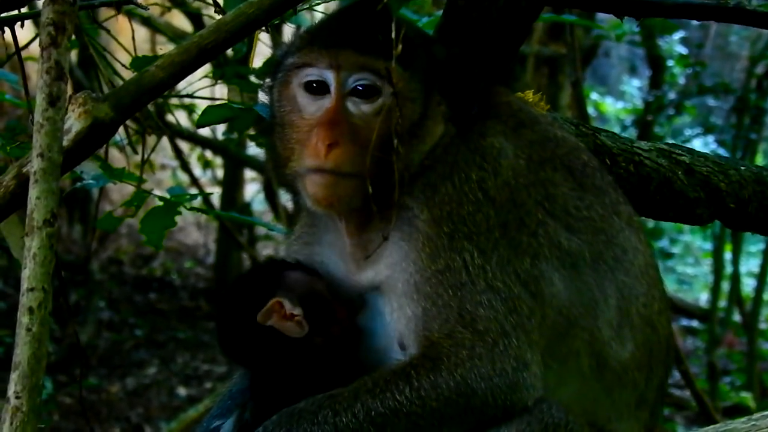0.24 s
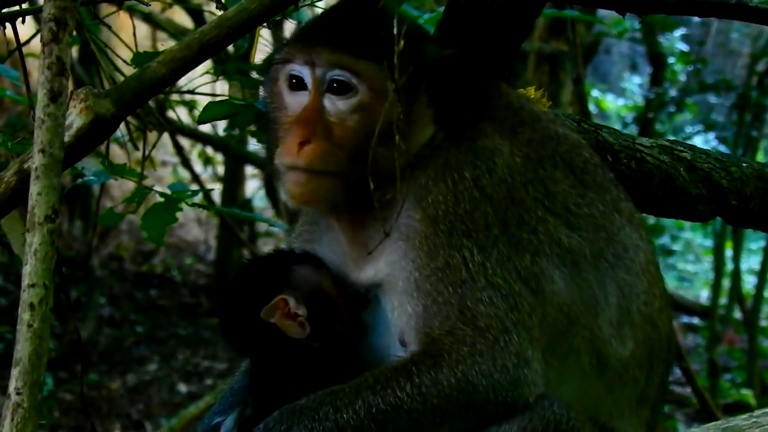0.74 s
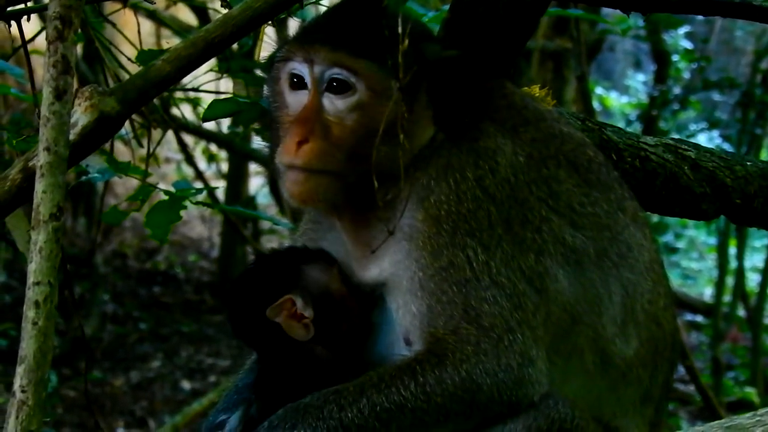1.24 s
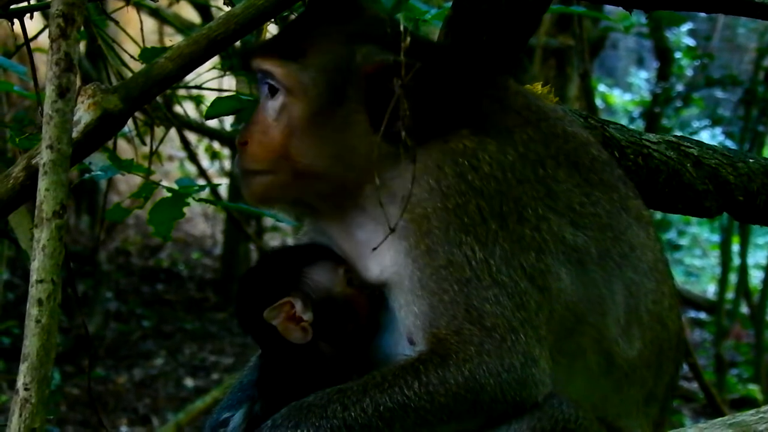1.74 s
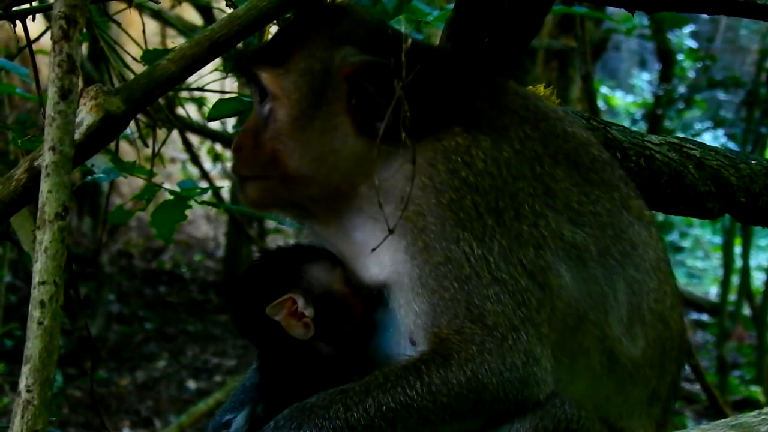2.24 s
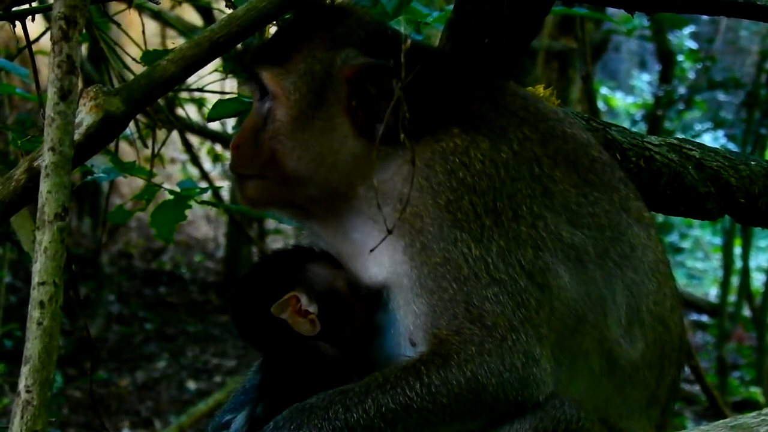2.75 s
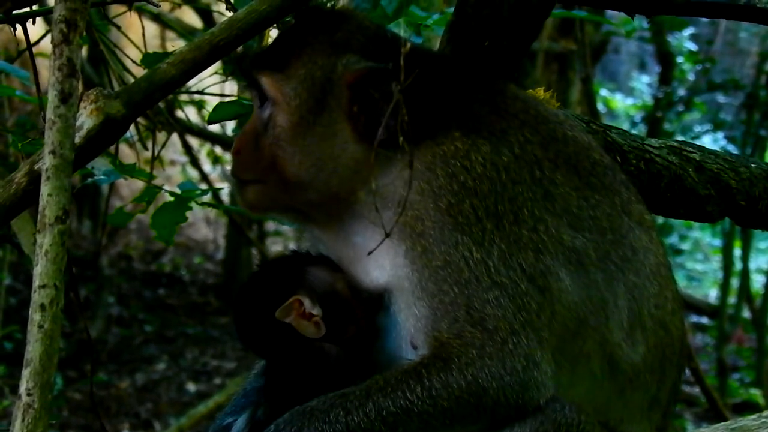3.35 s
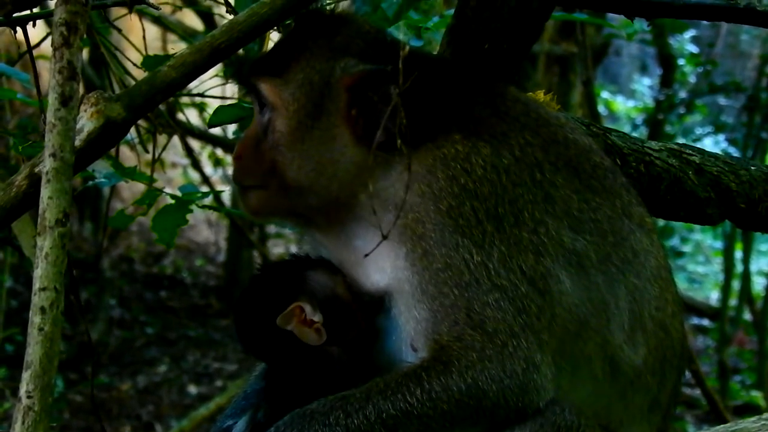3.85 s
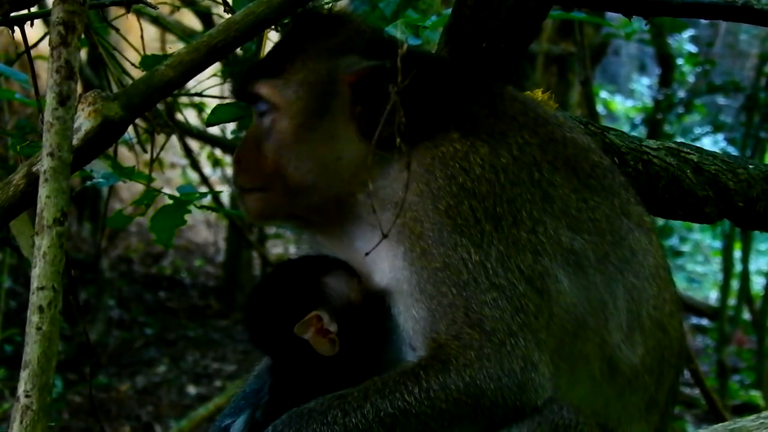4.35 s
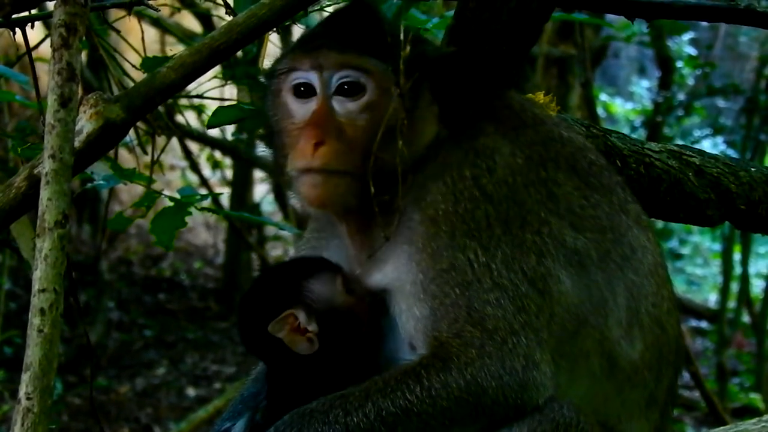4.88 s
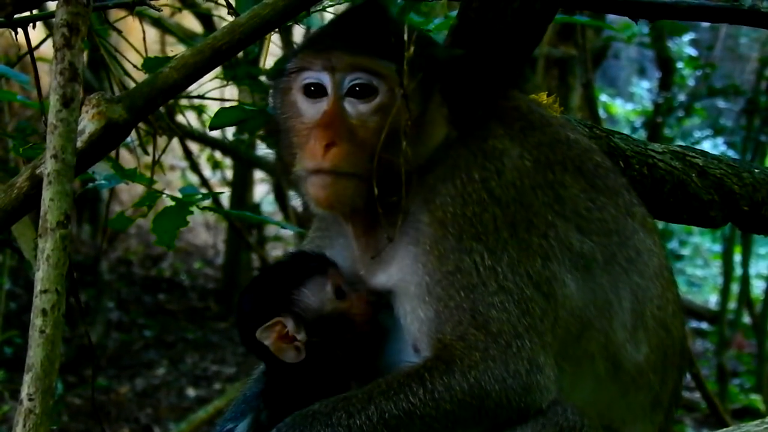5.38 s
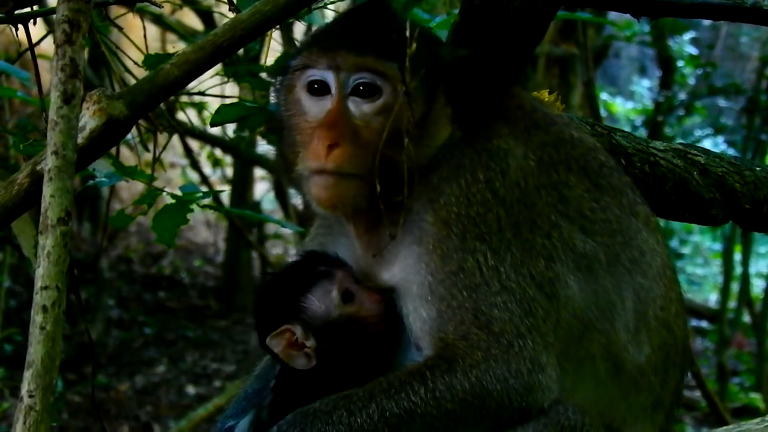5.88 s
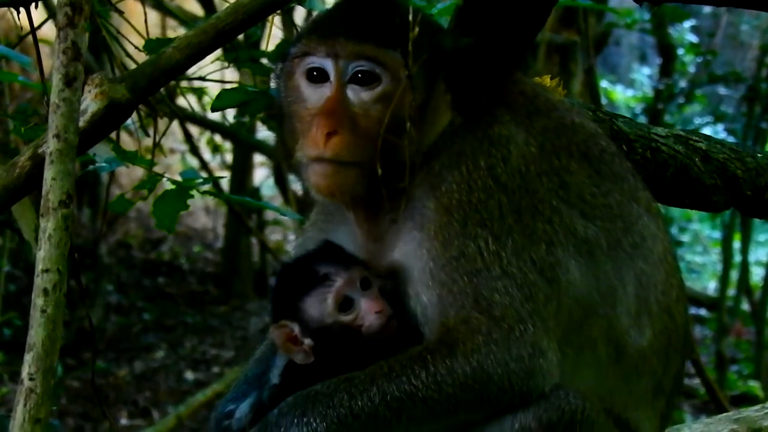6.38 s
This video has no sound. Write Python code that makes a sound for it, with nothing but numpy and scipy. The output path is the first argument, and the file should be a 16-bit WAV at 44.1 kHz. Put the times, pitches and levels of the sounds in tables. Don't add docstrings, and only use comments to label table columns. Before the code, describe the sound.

Close insects rasp bright, falling double chirps about five times a second over a blurred chorus, distant cicadas and a soft low rumble. Leaves rustle faintly and twigs knock dully. Past the four-second mark a monkey on the right gives one short muffled note and a longer, open cry that roughens and sags. The insects carry on. Wide stereo outdoor pickup among trees.

```python
import sys
import numpy as np
from scipy import signal
from scipy.fft import rfft, irfft
from scipy.io import wavfile
from scipy.ndimage import uniform_filter1d

SR = 44100
rng = np.random.default_rng(int(sys.argv[2]) if len(sys.argv) > 2 else 0)


def wav_out(sig):
    wavfile.write(sys.argv[1], SR, np.round(np.clip(np.atleast_2d(sig).T, -1, 1) * 32767).astype(np.int16))


def level_to_linear(level):
    exponent = np.asarray(level, float) / 20
    return 10 ** exponent


N = 291920

# [f/Hz, left-right likeness]
EAR_LIKENESS = [(60, .99), (130, .95), (290, .8), (640, .64), (1900, .5), (3300, .86), (4600, .55),
                (6800, .22), (9000, .05), (10400, .42), (12500, 0)]
# [f/Hz, left-right level/dB]
EAR_BALANCE = [(60, 0.5), (180, 3), (550, -0.5), (2300, -1), (3100, 3), (4300, -2), (6200, 0.5), (15000, 0)]
# [f/Hz, left lead/rad]
EAR_LEAD = [(300, 0), (1200, -.1), (3300, .2), (4200, -.2), (5700, 0), (7000, -1), (8400, -.6), (9600, -3),
            (12000, -3.3)]

# [f/Hz, density/dB]
AIR_SPECTRUM = [(12, -41), (20, -19.5), (68, 4), (113, 3), (153, -2.5), (215, -15.5), (300, -15.5),
                (817, -22), (2560, -26), (4000, -41), (8000, -30.5), (10800, -29), (11800, -40.5),
                (15700, -54)]

# [f/Hz, density/dB]
HIGH_CICADA_SPECTRUM = [(4400, -85), (5000, -2), (5400, -8.5), (5800, -12), (6150, -10.5), (6540, 1),
                        (6850, 2.5), (7150, -4.5), (7500, -15.5), (7900, -34), (8800, -25.5),
                        (10000, -40.5)]
LOW_CICADA_SPECTRUM = [(2000, -24), (2650, -15.5), (2800, -5.5), (3050, -2), (3400, 2.5), (3600, 0.5),
                       (3700, -4.5), (3780, -17), (4000, -6), (4600, -55)]
# [t/s, level/dB]
HIGH_CICADA_SWELL = [(0, -41), (1.5, -40.5), (2.3, -42), (2.8, -40.5), (3.9, -42.5), (4.64, -39.5),
                     (5.0, -41), (6.62, -41)]
LOW_CICADA_SWELL = [(0.0, -51.5), (0.09, -50.5), (0.73, -50.5), (0.92, -49.5), (0.94, -53), (1.38, -48.5),
                    (1.91, -52.5), (2.04, -50), (2.55, -50), (3.09, -53.5), (3.44, -50.5), (3.88, -52),
                    (3.93, -46.5), (4.17, -53.5), (4.83, -49), (5.97, -52.5), (6.23, -49.5), (6.6, -52.5)]

# [t/s, length/s, first f/Hz, last f/Hz, level/dB]
BIRD_NOTES = [
    (0.754, 0.28, 1225, 1263, -58),
    (0.83, 0.13, 1395, 1380, -63),
    (1.085, 0.092, 1292, 1264, -64),
    (2.466, 0.12, 960, 967, -60),
    (2.998, 0.18, 1200, 1345, -60.5),
    (3.134, 0.118, 1345, 1273, -63),
    (5.14, 0.075, 1460, 1462, -58),
    (6.42, 0.16, 1634, 1577, -65),
]
# [t/s, peak/dB, f/Hz]
CRICKET_NOTES = [(0.4145, -52, 3770), (0.4594, -46, 3900), (0.5794, -54, 3940), (1.068, -48, 3790),
                 (1.147, -47, 3920), (1.255, -50, 3860), (1.6731, -48, 3800), (1.738, -46, 3920),
                 (1.8432, -50, 3900), (3.9045, -57, 3900), (4.5002, -49, 3905), (5.062, -43, 3730),
                 (5.1986, -50, 3760), (5.6087, -47, 3740)]

# [f/Hz, density/dB]
LEAF_SPECTRUM = [(200, 5), (400, -3.5), (1000, 4), (2500, -1), (4000, 6.5), (7000, -35), (10000, -54)]
DRY_LEAF_SPECTRUM = [(2500, -15.5), (4000, -16), (5600, 4), (7500, -1.5), (9000, -13.5), (11000, -25),
                     (15000, -37)]
# [peak t/s, level/dB, dying time/s, fizz over hiss/dB]
LEAF_STIRS = [(.24, -57.5, 0.53, 5), (1.09, -59.5, 0.1, 0), (1.39, -57, 0.32, 5), (1.96, -69.5, 0.57, 11),
              (2.41, -61, 0.056, -2), (2.66, -62, 0.68, 4.5), (3.43, -57.5, 0.23, 4.5),
              (3.96, -64, 0.08, 12.5), (4.25, -59.5, 0.98, 2.5), (4.76, -60.5, 0.26, 7),
              (5.16, -62.5, 1, -2), (5.7, -65, 1, 1.5), (5.95, -61, 0.2, 4.5), (6.28, -61, 0.034, -9),
              (6.6, -68.5, 0.46, 6.5)]
# [t/s, peak/dB, f/Hz, left-right level/dB, t60/s]
TWIG_KNOCKS = [(.213, -37, 1240, 3, 0.14), (.226, -43, 640, 2, 0.04), (.374, -31.5, 438, 3, 0.099),
               (1.377, -29, 680, 1, 0.038), (1.39, -40, 500, 2, 0.36), (1.475, -41.5, 436, 3, 0.22),
               (1.914, -38.5, 830, 1, 0.045), (2.41, -34, 290, 3, 0.18), (2.432, -27, 176, 2, 0.15),
               (2.65, -41, 860, 0, 0.038), (2.975, -39, 716, 2, 0.043), (3.427, -33, 590, 1, 0.048),
               (3.936, -34.5, 820, 2, 0.047), (3.954, -40, 6160, 0, 0.25), (4.017, -34.5, 900, 3, 0.045)]
# [t/s, peak/dB, f/Hz, t60/s]
TWIG_SNAPS = [
    (3.9459, -22, 6900, .005),
    (3.9462, -28, 5400, .006),
    (3.9533, -23.5, 5850, .012),
]

# [t/s, level/dB]
CHORUS_SWELL = [(0, -41), (1.0, -43), (2.7, -42.5), (3.3, -43), (4.2, -43), (4.6, -42), (6.62, -42)]
# [closing stroke
# t/s, closing peak/dB, opening peak/dB]
NEAR_CHIRPS = [(.1332, -31, -27), (.3326, -26.5, -31), (.5197, -27.5, -33), (.7036, -28.5, -30),
               (.882, -26, -30), (1.064, -26.5, -30), (1.2567, -27, -28), (1.446, -26, -33),
               (1.641, -27, -27), (1.8272, -29.5, -33), (2.0135, -27, -30), (2.209, -27, -32),
               (2.3897, -25.5, -29), (2.61, -28.5, -30),
               (2.858, -25.5, -28), (3.042, -27, -31), (3.227, -27, -32), (3.4054, -28, -28),
                    (3.58, -27.5, -33), (3.761, -28, -31), (3.957, -26, -26.5), (4.145, -27, -39),
                    (4.344, -26, -28.5), (4.547, -27, -29), (4.7432, -28.5, -30), (4.956, -28, -28),
                    (5.148, -35, -31), (5.336, -28.5, -28.5), (5.5218, -26.5, -30), (5.703, -28, -32),
                    (5.954, -27, -31), (6.135, -26.5, -29.5), (6.312, -28, -28.5), (6.5025, -26.5, -29)]
# [first stroke t/s, peak/dB]
RIGHT_CHIRPS = [(.5985, -37.5), (.864, -34), (1.1139, -34), (1.3179, -36), (1.3618, -37), (1.6008, -32),
                (1.8522, -33.5), (2.0642, -39), (2.1051, -35), (2.3471, -32), (2.5985, -32), (3.1068, -31),
                (3.3328, -38), (3.3707, -32.5), (3.6196, -33.5), (3.7957, -39), (3.8631, -40), (3.913, -37),
                (4.116, -39), (4.1848, -34), (4.366, -44), (4.4617, -35), (4.6992, -35), (4.9316, -40),
                (5.2155, -37), (5.3597, -38), (5.4345, -41), (5.6679, -39), (6.2456, -34), (6.3495, -40),
                (6.4696, -36)]
# [first stroke t/s, peak/dB]
SMALL_CHIRPS = [(.157, -31), (.385, -31.5), (.611, -33.5), (.8395, -33), (1.494, -33), (1.7055, -32.5),
                (1.9355, -32), (2.161, -32), (2.6374, -32.5), (3.0684, -31.5), (3.2964, -32.5),
                (3.5203, -32), (3.7299, -32), (4.1684, -32), (6.0082, -31)]

# [t/s, f/Hz, effort/dB, mouth opening as 2nd partial/dB]
CALL_OPENING = [
    (4.252, 736, -48, -22),
    (4.284, 792, -34, -24),
    (4.3, 822, -32.5, -32),
    (4.334, 838, -28.5, -24),
    (4.359, 795, -36, -31),
    (4.373, 756, -51, -21),
]
CALL_CRY = [
    (4.386, 756, -50, -25),
    (4.404, 818, -34.5, -28),
    (4.425, 915, -32.5, -10),
    (4.443, 908.6, -32, -4),
    (4.512, 893.7, -32, 0.5),
    (4.546, 901.6, -32.5, 2),
    (4.591, 902, -32, 1),
    (4.62, 890, -31.5, 0.5),
]
CALL_FALL = [
    (4.649, 894, -33.5, -0.5),
    (4.69, 880, -33, -6),
    (4.748, 842, -34, -5.5),
    (4.854, 760, -39.5, -7.5),
    (4.876, 735, -54, 6),
    (4.898, 723, -47.5, -10),
    (4.925, 706, -54.5, -19),
    (4.965, 663, -49, -5),
    (4.985, 625, -69, -4),
]
# [t/s, level/dB]
FLUTTER_LEVEL = [(4.37, -67), (4.44, -58), (4.48, -52), (4.55, -49.5), (4.607, -52), (4.625, -37.5),
                 (4.66, -35.5), (4.72, -38.5), (4.775, -46.5), (4.815, -66), (4.84, -82)]
# [partial, side, level/dB]
FLUTTER_LINES = [(1, -1, -17), (1, 1, -1), (2, -1, -5), (2, 1, 3), (3, -1, -10), (3, 1, -30)]
# [f/Hz, level/dB]
THROAT_RING = [(5000, -37), (5500, -16.5), (5900, 1.5), (6300, 1.5), (6650, 1), (7200, -36), (8100, -22.5),
               (8700, -24), (9200, -45), (10000, -41)]
# [f/Hz, left-right level/dB]
CALL_BALANCE = [(60, 5), (180, 9), (550, -10.5), (1650, -11.5), (4970, -6), (15000, -38)]

OPENING_S, CLOSING_S = 0.00723, 0.0108
LOCK_S, BREAK_S, DRAIN_S = 4.607, 4.66, 0.069


def evened(x):
    return x / np.sqrt(np.mean(x ** 2) + 1e-20)


def smooth(x, *sizes):
    for size in sizes:
        x = uniform_filter1d(x, size=size, axis=0)
    return x


def read(points, hz):
    f, value = np.transpose(points)
    return np.interp(np.log(hz + 1), np.log(f + 1), value)


def curve(rows):
    return np.interp(np.arange(N) / SR, *np.transpose(rows))


def add(mix, s, sound, pan_db):
    part = mix[:, round(s * SR):][:, :len(sound)]
    part += level_to_linear([[pan_db / 2], [-pan_db / 2]]) * sound[:part.shape[1]]


def wash(spectrum, patchy_db, flicker_db, band_hz):
    frames, hz = N // 256 + 5, np.fft.rfftfreq(1024, 1 / SR)
    a, b, c, d, patches = rng.standard_normal((frames, 513, 5)).T
    patches = evened(uniform_filter1d(smooth(patches, 12), size=12, axis=1))
    flicker = evened(smooth(rng.standard_normal(frames), 3))
    same = np.clip(read(EAR_LIKENESS, hz), -1, 1)[:, None]
    common = a + 1j * b
    left = common * (level_to_linear(read(EAR_BALANCE, hz)) * np.exp(1j * read(EAR_LEAD, hz)))[:, None]
    right = same * common + np.sqrt(1 - same ** 2) * (c + 1j * d)
    gain = level_to_linear(read(spectrum, hz))
    inside = (hz > band_hz[0]) & (hz < band_hz[1])
    share = np.sqrt((gain[inside] ** 2).sum() / (gain ** 2).sum())
    z = np.array([left, right]) * gain[:, None] * level_to_linear(patchy_db * patches + flicker_db * flicker)
    return evened(signal.istft(z, nperseg=1024, noverlap=768)[1][:, :N]) / share


def forest(x, t60, gap_s):
    t = np.arange(SR // 2) / SR
    tail = rng.standard_normal((2, len(t))) * level_to_linear(-60 * t / t60) * (t > gap_s)
    return signal.oaconvolve(x, tail / np.linalg.norm(tail[0]), axes=1)[:, :N]


def air():
    return level_to_linear(-45) * wash(AIR_SPECTRUM, 2.02, 0.78, (20, 400))


def cicadas():
    high = level_to_linear(curve(HIGH_CICADA_SWELL) - 0.15) * wash(HIGH_CICADA_SPECTRUM, 0.4, 0.24, (6450, 7300))
    low = level_to_linear(curve(LOW_CICADA_SWELL) - 0.5) * wash(LOW_CICADA_SPECTRUM, 0.41, 0.87, (3150, 3680))
    return high + low


def birds_and_cricket():
    out = np.zeros((2, N))
    pan_db = -1.5
    for s, length_s, first_hz, last_hz, db in BIRD_NOTES:
        hz = np.linspace(first_hz, last_hz, round(length_s * SR))
        note = np.sin(2 * np.pi * np.cumsum(hz) / SR) * signal.windows.hann(len(hz)) ** .9
        add(out, s, np.sqrt(2) * level_to_linear(db) * note, pan_db)
    t = np.arange(0, .055, 1 / SR)
    for s, db, hz in CRICKET_NOTES:
        add(out, s, level_to_linear(db - 2) * np.sin(2 * np.pi * hz * t) * signal.windows.hann(len(t)), pan_db)
    return out + level_to_linear(-4) * forest(out, 0.12, 0.021)


def stirring():
    fall_db, rise_share = 14, 0.6
    s, db, dying_s, fizz_db = np.transpose(LEAF_STIRS)[:, :, None]
    late = (np.arange(0, N, 64) / SR - s) / dying_s
    hiss_db = db - fall_db * np.maximum(late, -late / rise_share)
    return [np.repeat(np.linalg.norm(level_to_linear(v), axis=0), 64)[:N] for v in (hiss_db, hiss_db + fizz_db)]


def leaves():
    hiss, fizz = stirring()
    out = hiss * wash(LEAF_SPECTRUM, 1.8, 1.5, (1500, 2500))
    return out + fizz * wash(DRY_LEAF_SPECTRUM, 2.2, 1.4, (7800, 10000))


def twigs():
    out = np.zeros((2, N))
    t = np.arange(SR // 4) / SR
    for s, db, hz, pan_db, t60 in TWIG_KNOCKS:
        band = signal.butter(3, [.6 * hz, 1.5 * hz], "band", fs=SR, output="sos")
        body = signal.sosfilt(band, rng.standard_normal(len(t)))
        mode = np.sin(2 * np.pi * hz * t)
        attack = 1 - np.exp(-t * hz / 0.8)
        knock = level_to_linear(db - 12.0 - 60 * t / t60) * (1.75 * evened(body) + mode) * attack
        muffle = signal.butter(6, 1.4 * hz, fs=SR, output="sos")
        add(out, s, signal.sosfilt(muffle, knock), pan_db)
    for s, db, hz, t60 in TWIG_SNAPS:
        attack = 1 - np.exp(-(t * hz / 1.5) ** 2)
        add(out, s, level_to_linear(db + 6 - 60 * t / t60) * np.sin(2 * np.pi * hz * t) * attack, -1)
    return out


def stroke(length_s, tune=1.0, beat=0.0, place=0.5, lean_db=0.0):
    first_hz, last_hz = 5100, 4311
    u = np.arange(0, 1, 1 / (SR * length_s))
    hz = tune * (first_hz + (last_hz - first_hz) * u ** 0.77)
    lobes = (1 - beat * np.exp(-((u - place) / 0.062) ** 2)) * level_to_linear(lean_db * (.5 - u))
    return np.sin(2 * np.pi * np.cumsum(hz) / SR) * np.sin(np.pi * u ** .72) ** .9 * lobes


def far_chorus():
    strokes_per_s, voices = 970, 6
    far = np.zeros((2, N))
    for tune in np.linspace(.94, 1.03, num=voices):
        hits = rng.random(N) < strokes_per_s / voices / SR
        train = level_to_linear(9.1 * np.minimum(rng.exponential(1, N), 2)) * hits
        add(far, 0, signal.oaconvolve(train, stroke(.009, tune))[:N], rng.uniform(-7, 3))
    far = evened(evened(far) + 0.5 * evened(forest(far, 0.12, 0.0028)))
    return level_to_linear(curve(CHORUS_SWELL) - 2.5) * far


def near_strokes():
    near_gap_s, neighbour_gap_s, second_db = 0.0124, 0.0063, -3
    pairs = NEAR_CHIRPS
    rows = [(s, db, 0, CLOSING_S, 1) for s, db, _ in pairs]
    rows += [(s - near_gap_s, db, 0, OPENING_S, 1) for s, _, db in pairs]
    for chirps, pan_db, tune in ((RIGHT_CHIRPS, -13.5, 1), (SMALL_CHIRPS, -4, 1.04)):
        rows += [(s, db, pan_db, OPENING_S, tune) for s, db in chirps]
        rows += [(s + neighbour_gap_s, db + second_db, pan_db, CLOSING_S, tune) for s, db in chirps]
    return rows


def insects():
    rows = near_strokes()
    paths = np.zeros((4, 2, N))
    for (s, db, pan_db, length_s, size), draws in zip(rows, rng.random((len(rows), 5))):
        tune, beat, place, lean, path = draws
        lean_db = 10.0 * (lean - .4) + 2.0 * (length_s == OPENING_S)
        tone = stroke(length_s, size + 0.031 * (tune - .5), 0.32 + 1.3 * beat, 0.27 + 0.32 * place, lean_db)
        add(paths[int(4 * path)], s - .0012, level_to_linear(db + 0.5) * tone, pan_db)
    both = sum(part + level_to_linear(-2.5) * forest(part, 0.18, 0.0088) for part in paths) + far_chorus()
    return signal.sosfilt(signal.butter(6, 4150, "high", fs=SR, output="sos"), both)


def clear_partials(t, hz, first_db, mouth_db, turn, locked, wobble, slip, waver_db):
    shake_db = 1.3
    second_db = first_db + mouth_db
    throat_db = -16.5 - 15 * abs(3 * hz - 2300) / 1000
    muffled_db = -16 * (t < CALL_CRY[0][0])
    third_db = -38.5 + 0.72 * (first_db + 41) + throat_db + muffled_db
    drained_db = -13 * np.clip((t - LOCK_S) / DRAIN_S / 2, 0, 1) ** .5
    seventh_db = second_db + 1 + 0.12 * np.minimum(mouth_db, 0) + drained_db
    first_db = first_db + shake_db * locked * evened(wobble)
    voice = level_to_linear(first_db) * np.sin(turn) - level_to_linear(second_db) * np.sin(2 * turn)
    voice += level_to_linear(third_db + .5 * waver_db) * np.sin(3 * turn)
    voice += level_to_linear(first_db - 29) * np.sin(4 * turn)
    return voice + level_to_linear(seventh_db + shake_db * evened(slip)) * np.sin(7 * turn)


def flutter_lines(turn, flutter, split_db, uneven_db):
    lines = 0
    for (k, side, db), waver_db in zip(FLUTTER_LINES, uneven_db):
        lines = lines + level_to_linear(split_db + db + waver_db) * np.sin(k * turn + side * flutter + k)
    band = signal.butter(2, (1250, 2350), "band", fs=SR, output="sos")
    breath = signal.sosfilt(band, rng.standard_normal(len(turn)))
    return lines + level_to_linear(split_db - 19) * evened(breath) * (1 + np.cos(flutter))


def bright_ring(t, hz, second_db, turn, flutter, share, split_db, slip, uneven_db):
    blur_rad, burst_db = 1.3, 2
    broken = (t - BREAK_S) / DRAIN_S
    blur = blur_rad * np.clip(broken, 0, 1) * evened(smooth(slip - smooth(slip, 200), 20, 20))
    burst = burst_db * np.clip(broken / 2, 0, 1)
    ring = np.zeros(len(t))
    for k in range(6, 11):
        if k != 7:
            db = second_db - 1.5 + read(THROAT_RING, k * hz) + uneven_db[k]
            ring += level_to_linear(db) * np.sin(k * turn + blur)
        for side in (-1, 1):
            db = split_db - 6.0 + 2.2 * side + burst + read(THROAT_RING, (k + side * share) * hz)
            db = db + 1.4 * uneven_db[k + 5 * side]
            ring += level_to_linear(db) * np.sin(k * turn + side * flutter + blur)
    return ring


def call_voice():
    s, *columns = np.transpose(CALL_OPENING + CALL_CRY + CALL_FALL)
    t = np.arange(s[0], s[-1], 1 / SR)
    hz, first_db, mouth_db = (smooth(np.interp(t, s, c), 200) for c in columns)
    split_db = np.interp(t, *np.transpose(FLUTTER_LEVEL))
    free_share, slide_s = 0.47, .16
    share = 1 / 3 + (free_share - 1 / 3) * np.clip((LOCK_S - t) / slide_s, 0, 1)
    rough = np.where(t < LOCK_S, .3, .08)
    locked = np.clip((t - LOCK_S) / DRAIN_S, 0, 1)
    wobble, slip = smooth(rng.standard_normal((len(t), 2)), 300, 300).T
    jitter = (.0008 + .003 * locked) * evened(wobble)
    turn = 2 * np.pi * np.cumsum(hz * (1 + jitter)) / SR
    flutter = np.cumsum(share * np.gradient(turn)) + 2.2 * rough * evened(slip)
    uneven_db = 2 * evened(smooth(rng.standard_normal((len(t), 16)), 500, 300)).T
    uneven_db += 1.4 * locked * evened(smooth(rng.standard_normal((len(t), 16)), 150, 150)).T
    voice = clear_partials(t, hz, first_db, mouth_db, turn, locked, wobble, slip, uneven_db[15])
    voice += flutter_lines(turn, flutter, split_db, uneven_db)
    second_db = first_db + mouth_db
    voice += bright_ring(t, hz, second_db, turn, flutter, share, split_db, slip, uneven_db)
    return s[0], voice * signal.windows.tukey(len(t), .02)


def monkey():
    start_s, voice = call_voice()
    dry = np.zeros(N)
    dry[round(start_s * SR):][:len(voice)] = np.sqrt(2) * voice
    pan = level_to_linear(read(CALL_BALANCE, np.fft.rfftfreq(N, 1 / SR)))
    pair = irfft(rfft(dry) * 2 * np.array([pan, np.ones_like(pan)]) / (1 + pan), N)
    return pair + level_to_linear(-20) * forest(pair, .5, .01)


def scene():
    return air() + cicadas() + birds_and_cricket() + leaves() + twigs() + insects() + monkey()


def low_pass(x):
    return signal.sosfilt(signal.butter(12, 16290, fs=SR, output="sos"), x)


def record(dry):
    cut = signal.sosfilt(signal.butter(4, 44, "high", fs=SR, output="sos"), dry)
    cut = irfft(rfft(cut) * (np.fft.rfftfreq(N, 1 / SR) < 15730), N)
    return low_pass(cut)


dry = scene()
out = record(dry)
wav_out(out)
```